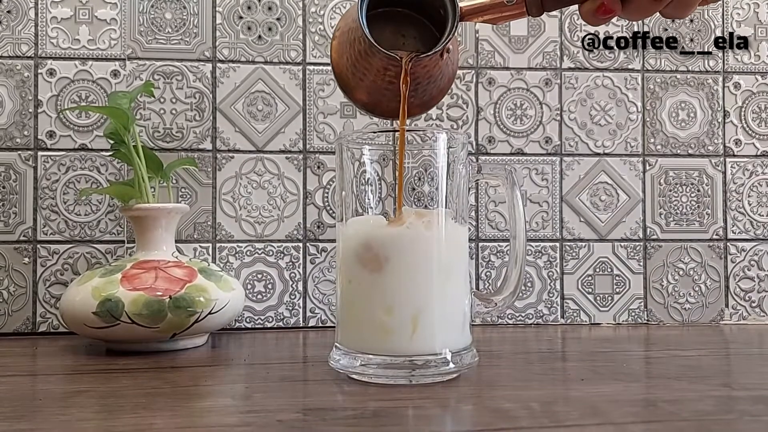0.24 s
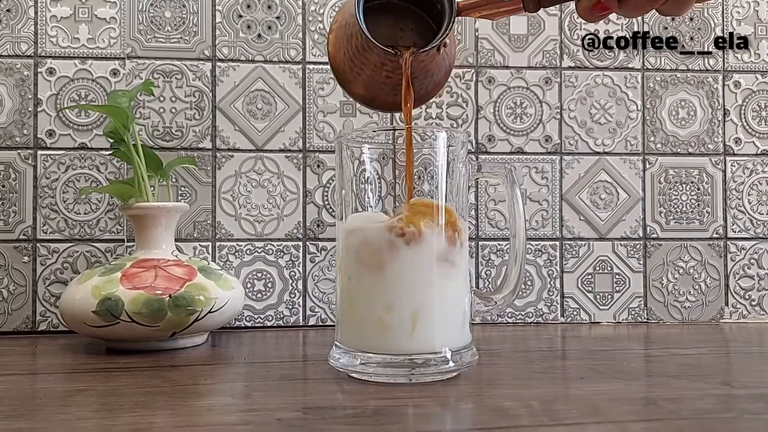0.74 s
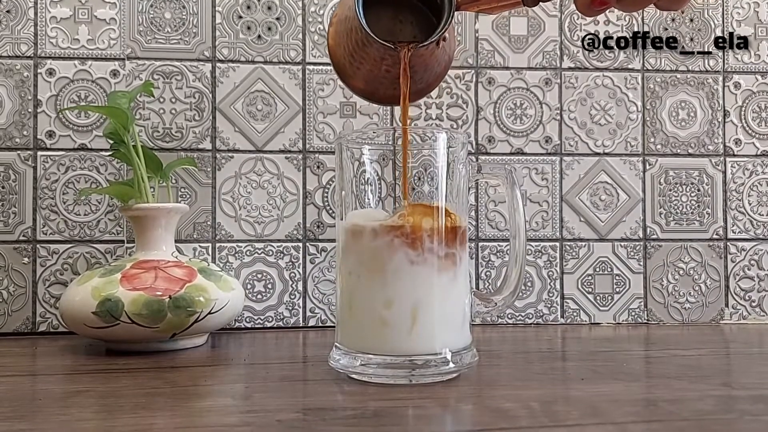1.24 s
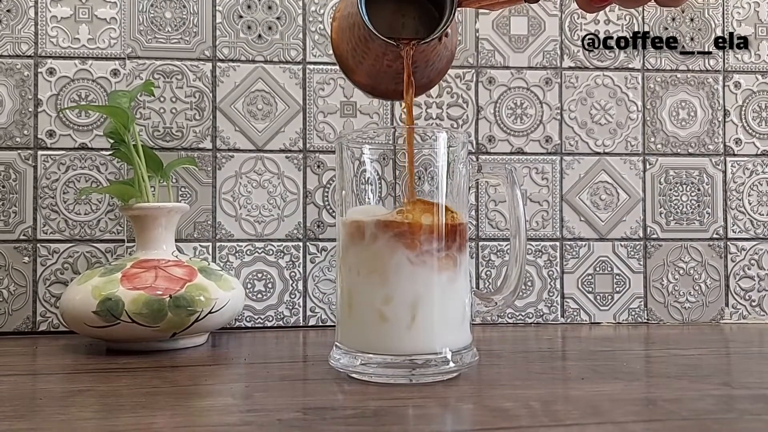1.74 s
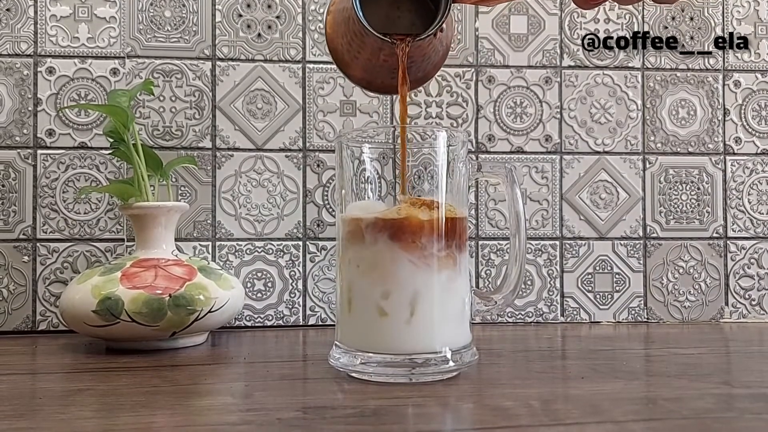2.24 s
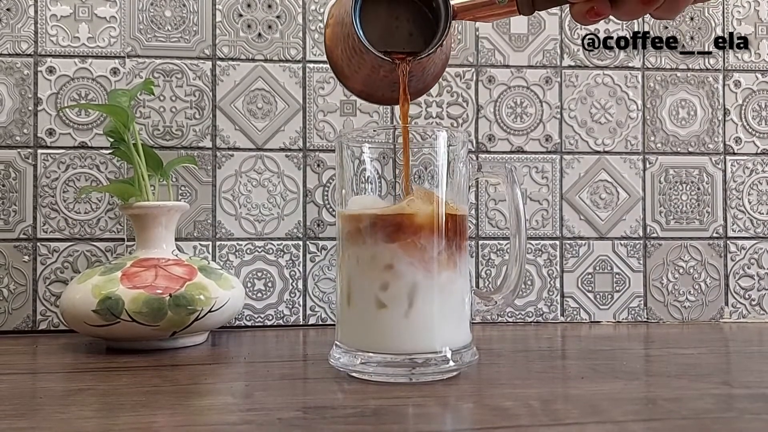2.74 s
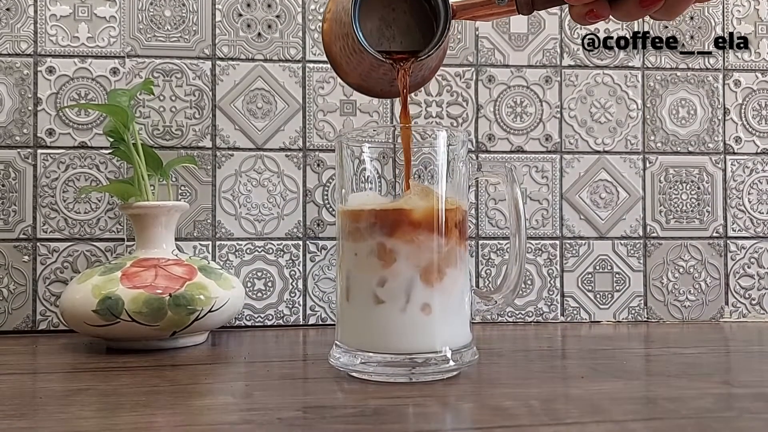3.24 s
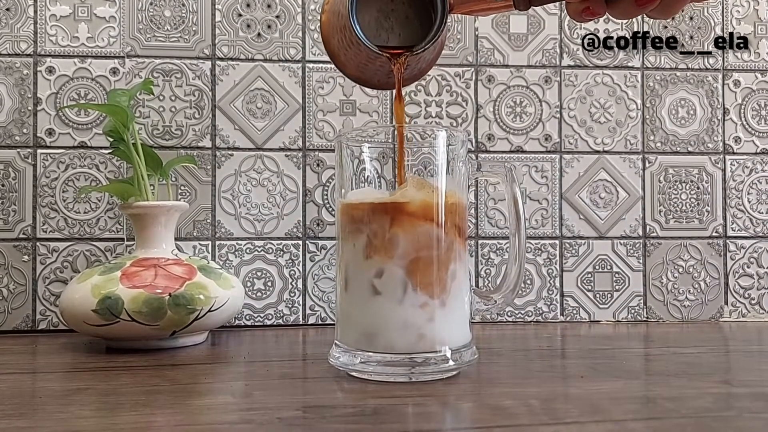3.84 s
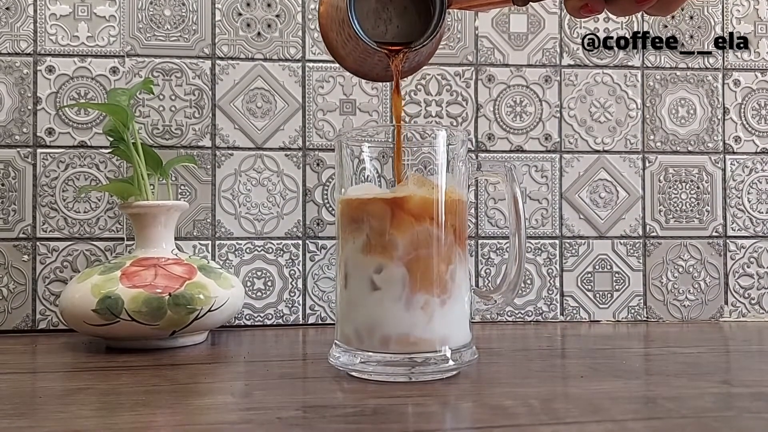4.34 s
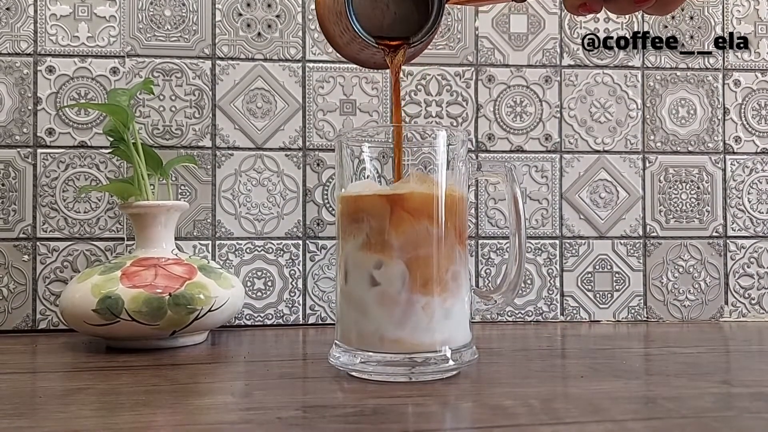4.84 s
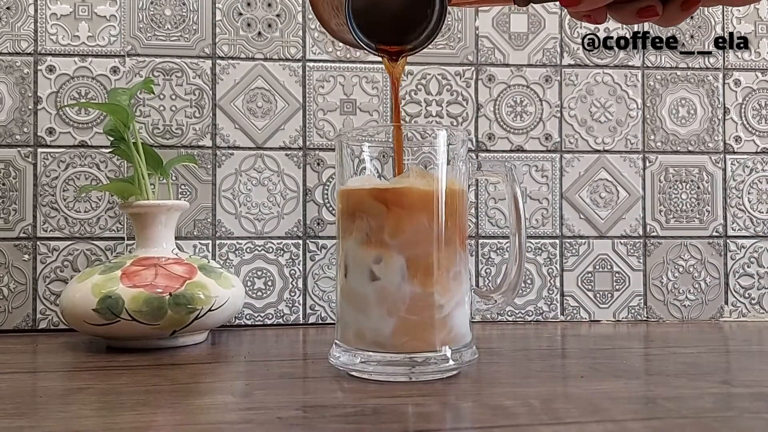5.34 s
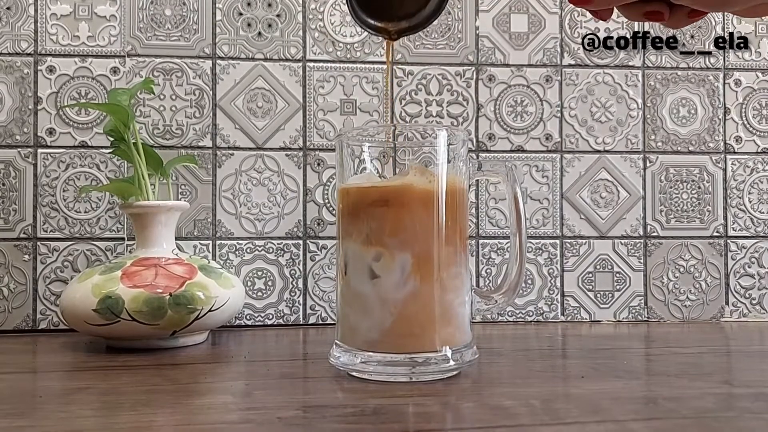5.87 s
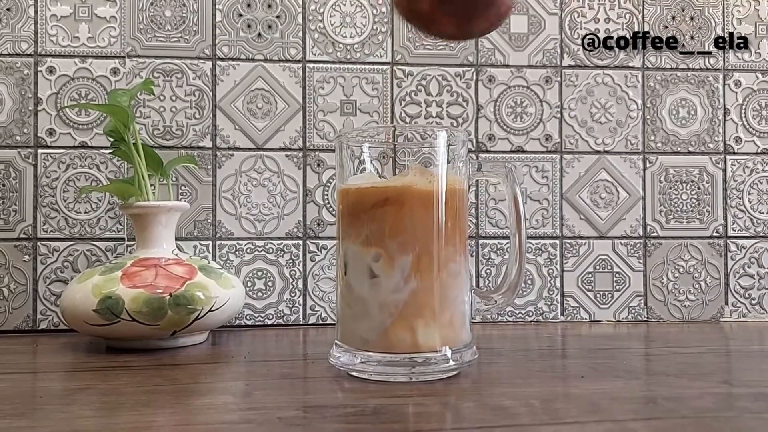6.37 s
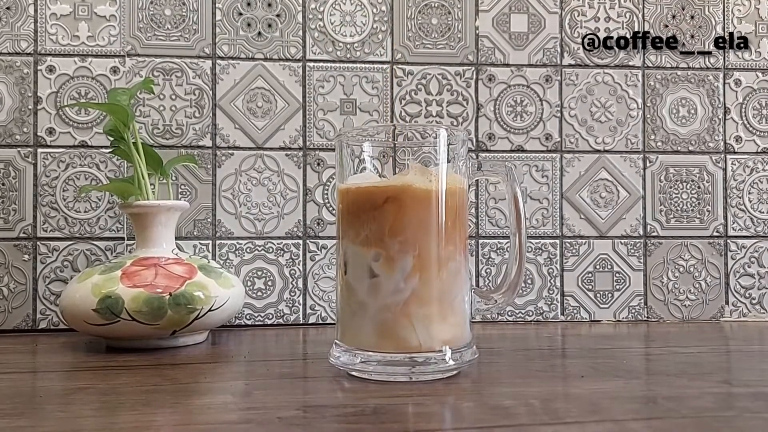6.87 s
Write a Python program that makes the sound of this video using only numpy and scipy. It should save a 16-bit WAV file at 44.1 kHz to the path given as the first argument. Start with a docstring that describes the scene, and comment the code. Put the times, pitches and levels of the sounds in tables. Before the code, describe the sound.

In a small tiled kitchen, a thin stream of coffee falls into a tall glass of milk and ice, heard mostly on the left with a short bright reverberation. It begins as a faint gurgle, with two or three round plops at about 0.1 s. From 1.5 s spatters and fizz build, and around 2.0-2.15 s comes a lively cluster of plops, snapping bubbles and clicking, ringing ice. The gurgle is fullest until about 2.9 s, with a wavering bubbly note, then softens. Small spatters and ice knocks follow near 3.1, 4.15, 5.1 and 5.5 s. From 5.8 s the stream thins, and dull, bassy bumps with slight taps press on the right microphone's housing, irregularly until 6.8 s and again at 7.05 s. A crisp tick at 6.55 s and a low drip plop at 6.63 s punctuate this. Low rumble, a fan-like rush, faint hum and hiss continue throughout.

```python
"""A thin stream of coffee gurgles and fizzes softly from a metal pot into a tall glass of milk and ice.
Clicked resonances make the gurgle, wash and ringing ice; dying sines make the bubbles, which plop and burst.
All of it is mostly on the left, with a noise tail for the tiled kitchen.
As the pour thins to drips, force pulses through a bass cut become dull bumps on the right microphone's housing.
Coloured noise and steady tones make the rumble, rush, hiss and hum behind."""
import sys
import numpy as np
from scipy import signal
from scipy.fft import rfft, irfft
from scipy.io import wavfile
from scipy.ndimage import uniform_filter1d

SR = 44100
rng = np.random.default_rng(int(sys.argv[2]) if len(sys.argv) > 2 else 0)


def pcm_store(signal):
    """Save signal as 16-bit PCM."""
    levels = np.round(np.clip(np.atleast_2d(signal), -1, 1) * 32767)
    wavfile.write(sys.argv[1], SR, levels.astype(np.int16).T)


N = 313222
TIME = np.arange(N) / SR


def from_db(db):
    """Decibels to amplitude."""
    return 10 ** (np.asarray(db) / 20)


def rms_one(x):
    """Scale to unit RMS."""
    return x / np.sqrt(np.mean(x ** 2) + 1e-20)


def peak_one(x):
    """Scale to unit peak."""
    return x / (np.abs(x).max() + 1e-20)


def energy_one(x):
    """Scale to unit energy."""
    return x / np.sqrt(np.sum(x ** 2) + 1e-20)


def add(track, start_s, sound):
    """Mix a sound into a track."""
    start = max(round(start_s * SR), 0)
    track[start:start + len(sound)] += sound[:max(N - start, 0)]


def drift(rate_hz):
    """Slow random curve of unit RMS, with rate_hz knots per second."""
    knots = rng.standard_normal(int(N / SR * rate_hz) + 2)
    return rms_one(np.interp(TIME * rate_hz, np.arange(len(knots)), knots))


def resonate(x, hz, width_hz):
    """A resonance applied twice, for steep skirts; gain near 1 on top."""
    radius = np.exp(-np.pi * 1.5 * width_hz / SR)   # each pass is wider than the pair
    angle = 2 * np.pi * min(hz, .45 * SR) / SR
    edge = (1 - radius ** 2) / 2
    section = [edge, 0, -edge, 1, -2 * radius * np.cos(angle), radius ** 2]
    return signal.sosfilt([section, section], x + 1e-18)


def body(x, modes):
    """Parallel resonances with alternating sign."""
    out = 0
    for k, (hz, width_hz, level_db) in enumerate(modes):
        out = out + from_db(level_db) * (-1) ** k * resonate(x, hz, width_hz)
    return out


def high_pass(x, hz, q):
    """Second-order bass cut that rings at its corner when q is high."""
    w = 2 * np.pi * hz
    return signal.lfilter(*signal.bilinear([1, 0, 0], [1, w / q, w * w], SR), x + 1e-18)


def grains(per_s, spread_db):
    """Random clicks of uneven size, arriving in clumps."""
    born = rng.random(N) < per_s * from_db(3 * drift(25)) / SR
    size_db = spread_db * np.minimum(rng.exponential(1, N), 4)
    return born * rng.choice([-1, 1], N) * from_db(size_db)


def crack(t60_s):
    """A short burst of noise that dies away."""
    t = TIME[:SR // 5]
    return rng.standard_normal(len(t)) * from_db(-60 * t / t60_s)


def kitchen(x, wet_db, right_db):
    """Direct sound plus a tail from tiles and table; the right microphone faces away."""
    t60_s = 0.28
    t = TIME[:SR // 2]
    tails = rng.standard_normal((2, len(t))) * from_db(-60 * t / t60_s) * (t > .005)
    # air and walls dull the top
    tails = signal.sosfilt(signal.butter(1, 11000, fs=SR, output="sos"), tails)
    tails *= from_db(wet_db) / np.sqrt(np.sum(tails ** 2, axis=1, keepdims=True))
    tails[:, 0] = 1   # direct sound
    both = signal.fftconvolve(x[None], tails, axes=1)[:, :N]
    both /= np.sqrt(1 + from_db(2 * wet_db))
    return both * from_db([[0], [right_db]])


def stream():
    """Entrained air excites the column above the milk; smaller bubbles blur into a wash or ring singly."""
    # air column above the milk: hz, width_hz, level_db
    column_modes = [(816, 185, 0), (821, 100, 6.5), (1010, 110, -7.5), (1283, 135, 1), (1500, 180, -12.5)]
    # milk heaving under the stream: hz, width_hz, level_db
    slosh_modes = [(247, 36, -6), (351, 85, -4), (446, 100, -1.5), (540, 260, -9)]
    # small bubbles against the glass wall: hz, width_hz, level_db
    fizz_modes = [(1940, 60, -7.5), (2085, 140, -15), (2340, 670, -5.5), (3252, 100, -5), (3850, 690, -9)]
    # finest spray: hz, width_hz, level_db
    spray_modes = [(5580, 910, -1), (7290, 670, 1.5), (10280, 1500, -6), (12800, 1600, -3)]
    gurgle_gain, fizz_gain, spray_gain = stream_gains()

    gurgle = rms_one(body(grains(per_s=1100, spread_db=3.0), column_modes))
    gurgle *= gurgle_gain * from_db(-2.0)
    slosh = rms_one(body(grains(per_s=280, spread_db=1.0), slosh_modes))
    slosh *= gurgle_gain * from_db(-5)

    fizz = bubble_cloud(fizz_modes, per_s=370, cycles=29, spread_db=5.0)
    fizz += rms_one(body(grains(per_s=1200, spread_db=6.0), fizz_modes))
    fizz *= fizz_gain * from_db(-4)
    spray = bubble_cloud(spray_modes, per_s=570, cycles=110, spread_db=7.5)
    spray += rms_one(body(grains(per_s=4600, spread_db=1.5), spray_modes))
    spray *= spray_gain * from_db(-7.0)

    low = kitchen(gurgle + slosh + fizz, wet_db=-3.5, right_db=-45)
    return low + kitchen(spray, wet_db=-10.5, right_db=-36)


def stream_gains():
    """Gurgle, fizz and spray grow with the stream; every spatter adds its own power to them."""
    # strength of the stream: time_s, level_db
    pour = [(0, -63.5), (1.1, -63), (1.8, -60), (2.15, -55), (2.8, -55), (3.05, -60.5), (3.9, -60),
            (4.5, -62.5), (4.85, -65.5), (5.7, -63.5), (7.1, -69.5)]
    # stream or last drip catches the ice: start_s, hold_s, fizz_db, spray_db
    spatters = [(1.562, 0.14, -73, -69.5), (1.743, 0.29, -73.5, -66.5), (2.04, 0.061, -65.5, -70),
                (2.665, .16, -77, -70.5), (3.055, 0.094, -75, -66), (3.73, 0.25, -79.5, -71),
                (4.12, .09, -71.5, -74), (4.423, 0.21, -78.5, -75.5), (5.115, 0.044, -77, -78),
                (5.49, 0.12, -71.5, -67), (6.627, 0.04, -75, -70.5)]
    pour_db = np.interp(TIME, *np.transpose(pour))
    below_full_db = pour_db + 56   # relative to a full pour
    fizz, spray = np.zeros((2, N))
    for start_s, hold_s, fizz_db, spray_db in spatters:
        shape = spatter(start_s, hold_s)
        fizz = np.hypot(fizz, from_db(fizz_db) * shape)
        spray = np.hypot(spray, from_db(spray_db) * shape)
    # a spatter also stirs up gurgle, 7 dB above its fizz gain
    gurgle_gain = np.hypot(from_db(pour_db), from_db(7) * fizz)
    # slopes: dB per dB of the stream
    fizz_gain = np.hypot(from_db(-79.5 + 0.81 * below_full_db), fizz)
    spray_gain = np.hypot(from_db(-78 + 0.37 * below_full_db), spray)
    return gurgle_gain, fizz_gain, spray_gain


def spatter(start_s, hold_s):
    """Envelope of a spatter: quick rise, hold, exponential decay."""
    attack_s, t60_s = 0.0079, 0.28
    rise = np.clip((TIME - start_s) / attack_s, 0, 1)
    return rise * from_db(-60 * np.clip(TIME - start_s - hold_s, 0, 1) / t60_s)


def bubble_cloud(spectrum, per_s, cycles, spread_db):
    """Bubbles born at random ring as dying sines, each with its own pitch and size."""
    out, t, rows = np.zeros(N), TIME[:SR // 30], np.array(spectrum)
    draws = rng.random((6000, 4))
    for when, row, offset, size in draws[:int(per_s * N / SR)]:
        hz, width_hz, level_db = rows[int(row * len(rows))]
        hz = hz + (offset - .5) * width_hz
        size_db = spread_db * min(-np.log(size), 4)
        fall_db = 60 * t * hz / cycles   # 60 dB down after this many cycles
        onset = 1 - np.exp(-t * hz / 2)
        bubble = from_db(level_db + size_db - fall_db) * np.sin(2 * np.pi * hz * t) * onset
        add(out, when * N / SR, bubble)
    return rms_one(out)


def trills():
    """Runs of bubbles of one size blur into a wavering note or a narrow hiss."""
    # stream boring in or foam settling: start_s, end_s, hz, width_hz, level_db
    runs = [(0.506, .84, 2756, 55, -77.5), (0.752, .966, 2960, 140, -80), (.76, 0.98, 2300, 80, -83),
            (1.65, 1.924, 1103, 36, -63), (1.7, 2.05, 7200, 1000, -73), (2.19, 3.084, 2190, 573, -75.5),
            (2.23, 2.963, 831, 57.5, -60.5), (2.67, 2.83, 2090, 110, -72), (2.75, 3.366, 390, 194, -61.5),
            (3.643, 3.974, 5300, 790, -82), (3.92, 4.816, 1910, 199, -77), (5.195, 5.3, 5440, 1600, -74),
            (5.526, 5.744, 337, 70, -59), (5.6, 5.89, 12600, 3040, -75)]
    out = np.zeros(N)
    for start_s, end_s, hz, width_hz, level_db in runs:
        swell = np.clip(np.minimum(TIME - start_s, end_s - TIME) / 0.046, 0, 1)
        run = resonate(grains(per_s=450, spread_db=1.5), hz, width_hz)
        # a steady stream keeps the supply of bubbles even
        supply = np.sqrt(np.abs(uniform_filter1d(run ** 2, size=SR // 20)) + 1e-12)
        out += from_db(level_db) * swell * run / supply
    return kitchen(out, wet_db=-4.5, right_db=-29)


def ice():
    """Each shift is a click and brief rattle that excite the ringing of ice and filled glass."""
    # ice shifting: start_s, level_db, bright_db, low_db
    knocks = [(1.979, -42, -37, -14), (2.027, -50.5, -23, -11), (2.046, -37.5, -23, -16),
              (2.099, -50, -23, -11), (3.13, -49, -28, -4), (4.129, -44, -29, -12),
              (4.163, -42, -17.5, -16), (4.97, -51.5, -14.5, -5.5), (5.123, -49.5, -12.5, -10),
              (5.492, -48.5, -11.5, -2), (5.585, -40.5, -9.5, -8.5)]
    # ringing of ice and filled glass: hz, width_hz, level_db
    knock_modes = [(303.4, 23, -2.5), (420, 86, -7), (646, 230, -14), (844, 146, 2.5), (1186, 120, -3.5),
                   (1385, 94, -2.5), (1524, 116, -4.5), (1900, 117, 10.5), (2490, 82, 4), (3110, 120, -5.5),
                   (3860, 130, -17)]
    out = np.zeros(N)
    for start_s, level_db, bright_db, low_db in knocks:
        modes = np.array(knock_modes, float)
        modes[:, 2] += 0.52 * rng.standard_normal(len(modes))   # every touch finds another spot
        low, middle, high = np.split(modes, [2, 7])
        contact = .5 * energy_one(crack(t60_s=0.034))
        contact[0] += 1
        knock = energy_one(body(contact, middle))
        knock += from_db(bright_db + 5.5) * energy_one(body(contact, high))
        knock += from_db(low_db + 9.0) * energy_one(body(contact, low))
        add(out, start_s, from_db(level_db + 21.5) * knock)
    return kitchen(out, wet_db=-2.5, right_db=-23.5)


def plops():
    """A large bubble pinches off with a small splash, then rings as a dying sine of slightly rising pitch."""
    # single large bubbles: start_s, level_db, pitch_hz
    bubbles = [(.081, -35.5, 1174), (.11, -42.5, 1230), (0.083, -58, 3060), (.13, -59, 2400),
               (1.291, -58.5, 3100), (1.802, -52, 2220), (1.999, -41.5, 745), (2.027, -35, 1336),
               (2.047, -33.5, 1264), (2.048, -39, 2980), (2.1, -38.5, 2480), (2.103, -41.5, 2970),
               (2.156, -48, 2230), (2.361, -49, 3070), (3.102, -52.5, 3180), (3.975, -56, 2000),
               (4.389, -52, 1920), (5.125, -45.5, 1960), (5.554, -46.5, 2400), (6.63, -48.5, 575)]
    out, t = np.zeros(N), TIME[:SR // 5]
    for start_s, level_db, hz in bubbles:
        t60_s = 34 / hz   # dies away in 34 periods
        phase = 2 * np.pi * hz * t * (1 + 0.026 * t / t60_s)
        onset = 1 - np.exp(-t / 0.0014)
        ring = from_db(-60 * t / t60_s) * np.sin(phase) * onset
        splash = from_db(-10) * peak_one(resonate(crack(t60_s=0.044), hz, 0.12 * hz))
        add(out, start_s, from_db(level_db + 3.5) * (ring + splash))
    return kitchen(out, wet_db=-5.5, right_db=-25.5)


def ticks():
    """A film bursts or a drip lands: a snap or a short splutter with a high ring."""
    # bursting bubbles and drips: start_s, level_db, ring_hz, t60_s, snap_db
    bursts = [(1.485, -62.5, 7200, 0.23, -5), (1.5832, -57.5, 6940, .04, -22), (1.79, -58, 6560, .047, -11),
              (1.965, -58, 5180, 0.12, -21), (1.999, -54, 12100, .09, -8), (2.031, -54.5, 6700, .033, -8),
              (2.061, -55, 5470, 0.032, -23), (2.137, -60, 10300, 0.046, -14),
              (2.3083, -60, 5300, 0.039, -6), (3.135, -56, 10700, .036, 2), (3.529, -57, 5800, 0.045, -14),
              (3.8022, -60, 12100, .038, -8), (3.91, -60, 5760, .035, -23),
              (4.164, -59.5, 6000, 0.044, -10), (4.441, -58.5, 6750, 0.057, -2),
              (4.535, -64, 6650, 0.04, -22), (4.602, -63, 6650, .03, -24), (6.5552, -45, 7420, 0.01, -1),
              (6.631, -65, 11000, .02, -6), (6.658, -56.5, 6570, .035, -7)]
    out = np.zeros(N)
    snap_band = signal.butter(2, [8200, 13500], "band", fs=SR, output="sos")
    for start_s, level_db, hz, t60_s, snap_db in bursts:
        snap = energy_one(crack(t60_s=max(t60_s, .002)))
        snap[0] += .35
        tick = peak_one(resonate(snap, hz, 1100))
        tick += from_db(snap_db + 6.0) * peak_one(signal.sosfilt(snap_band, snap))
        # so small a film radiates little below its own ring
        low_cut = signal.butter(6, min(0.68 * hz, .4 * SR), "high", fs=SR, output="sos")
        tick = signal.sosfilt(low_cut, tick)
        add(out, start_s, from_db(level_db + 7.0) * peak_one(tick))
    return kitchen(out, wet_db=-7.0, right_db=-36)


def bumps():
    """Soft pushes on the right housing; the microphone's bass cut turns each into a short boom."""
    # pushes on the housing: start_s, force_db, time_constant_s
    pushes = [(5.795, -22, 0.002), (5.8132, -18, 0.0043), (5.819, -10, 0.0038), (5.8672, -15, 0.0022),
              (6.0049, -14.5, 0.0028), (6.0675, -19.5, 0.0025), (6.0811, -12.5, 0.002),
              (6.091, -11, 0.0038), (6.116, -14.5, 0.0019), (6.1442, -6.5, 0.0043), (6.1729, -21, 0.0012),
              (6.194, -14.5, 0.0016), (6.2935, -6.5, 0.0054), (6.3434, -6, 0.0062), (6.375, -8, 0.0054),
              (6.402, -16, 0.0021), (6.5017, -19.5, 0.0032), (6.5207, -13.5, 0.0021),
              (6.7176, -7.5, 0.0039), (6.7292, -13.5, 0.0033), (6.7975, -11.5, 0.002), (7.047, -5, 0.0016),
              (7.0751, -13, 0.0016)]
    # hard touches on the housing: start_s, level_db, lowpass_hz
    taps = [(5.7971, -35.5, 4500), (5.8123, -40, 905), (7.0468, -33, 2180)]
    # ringing of the housing: hz, width_hz, level_db
    housing_modes = [(388, 140, 10.5), (755, 720, -19.5), (1680, 420, -9.5), (4200, 2700, -50),
                     (12500, 4700, -46)]
    force, clicks, t = np.zeros(N), np.zeros(N), TIME[:SR // 10]
    for start_s, force_db, time_constant_s in pushes:
        u = t / max(time_constant_s, .0003)
        add(force, start_s, from_db(force_db) * (u / 2) ** 2 * np.exp(2 - u))   # peaks at u = 2
    tap = body(signal.unit_impulse(len(t)), housing_modes)
    for start_s, level_db, lowpass_hz in taps:
        soft = signal.butter(1, min(lowpass_hz, .45 * SR), fs=SR, output="sos")
        add(clicks, start_s, from_db(level_db) * peak_one(signal.sosfilt(soft, tap)))
    boom = high_pass(force, hz=70.4, q=3.95)
    boom = high_pass(boom, hz=143, q=1.09)
    boom = high_pass(boom, hz=24, q=0.65)
    # the contact rubs a little while it presses, and the support sways after it
    rub = from_db(-41.0) * force * rms_one(resonate(rng.standard_normal(N), hz=260, width_hz=80))
    sway = from_db(-19.5) * resonate(force, hz=45.0, width_hz=18)
    near = boom + rub + sway + clicks
    # the far (left) microphone gets it weakly, through the flexing case
    far = from_db(-34.5) * resonate(boom, hz=109, width_hz=57) + from_db(-18) * clicks
    return np.array([far, near])


def room():
    """Rumble, the rush and hum of an appliance, and microphone hiss: coloured noise plus wavering sines."""
    # room rumble: hz, left_db_per_hz, right_db_per_hz, before the level curve
    rumble_spectrum = [(22, -97, -95.5), (42, -78.5, -70.5), (68, -72.5, -66), (101, -69, -75),
                       (134.1, -74.5, -72), (163.3, -81, -86.5), (216, -90.5, -100), (319, -120, -120)]
    # rumble level curve: time_s, level_db
    rumble_level = [(0, -3.5), (1.15, -5.5), (1.9, 0), (2.5, -2), (4.8, -2), (5.7, 2)]
    # fan-like rush: hz, left_db_per_hz, right_db_per_hz
    rush_spectrum = [(162.5, -105, -112), (244, -83.5, -87.5), (334, -78.5, -94), (350, -89, -90),
                     (501.4, -81.5, -103.5), (595, -94.5, -109), (713, -86, -109), (814, -92.5, -112),
                     (974, -98, -115), (1020, -91.5, -114), (1187, -94, -116), (1260, -103, -115),
                     (1557, -99, -120), (1820, -122, -135)]
    # microphone hiss: hz, left_db_per_hz, right_db_per_hz
    hiss_spectrum = [(1520, -118, -122), (2160, -114, -122), (2350, -111, -124), (3460, -120, -125),
                     (4350, -125, -126), (5270, -124, -126), (6180, -116, -127), (6600, -114, -128),
                     (6700, -112, -128), (7630, -121, -128), (9600, -121, -125), (11040, -116, -120),
                     (13200, -118, -121), (15700, -122, -124)]
    # steady kitchen tones: hz, left_rms_db
    hum_tones = [(120, -68.5), (323, -77), (3386, -102), (6848, -93.5)]
    hum = np.zeros(N)
    for hz, rms_db in hum_tones:
        phase = 2 * np.pi * hz * TIME + 1.02 * drift(11)
        hum += from_db(rms_db) * np.sqrt(2) * np.sin(phase)
    rumble_gain = from_db(np.interp(TIME, *np.transpose(rumble_level)))
    rumble = rumble_gain * steady_noise(rumble_spectrum, alike=0.53)
    air = steady_noise(rush_spectrum, alike=0.33) + steady_noise(hiss_spectrum, alike=0.0)
    return rumble + air + hum * from_db([[0], [-7]])


def steady_noise(spectrum, alike):
    """Stereo noise with a colour for each side; alike is their correlation before colouring."""
    hz, left_db, right_db = np.transpose(spectrum)
    log_f = np.log(np.maximum(np.arange(N // 2 + 1) * SR / N, 1))
    log_hz = np.log(hz)
    # steep skirts beyond the end points
    outside = np.maximum(log_hz[0] - log_f, 0) + np.maximum(log_f - log_hz[-1], 0)
    colour = [from_db(np.interp(log_f, log_hz, db) - 60 * outside) for db in (left_db, right_db)]
    one, other = rng.standard_normal((2, N))
    white = np.array([one, alike * one + np.sqrt(1 - alike ** 2) * other])
    return irfft(rfft(white) * colour, N) * np.sqrt(SR / 2)   # density in dB per Hz


def scene():
    """The glass, the housing and the room together."""
    return stream() + trills() + ice() + plops() + ticks() + bumps() + room()


def record(dry):
    """Steep elliptic cut of the top above 15750 Hz."""
    return signal.sosfilt(signal.ellip(10, .2, 70, 15750, fs=SR, output="sos"), dry)


dry = scene()
out = record(dry)
pcm_store(out)
```